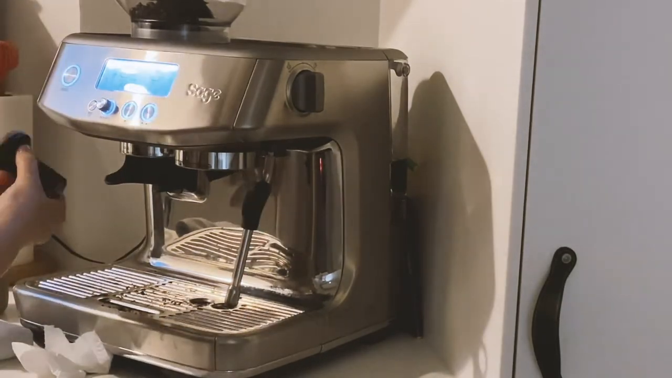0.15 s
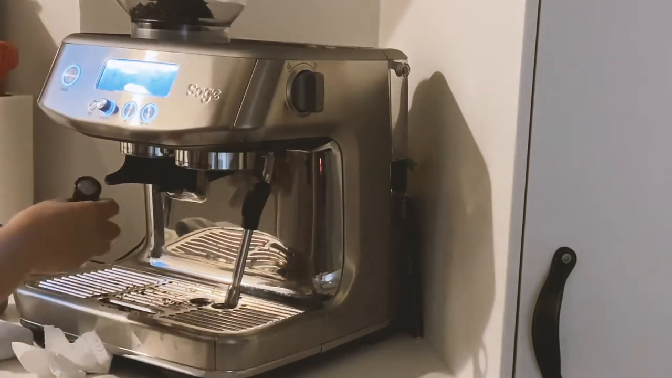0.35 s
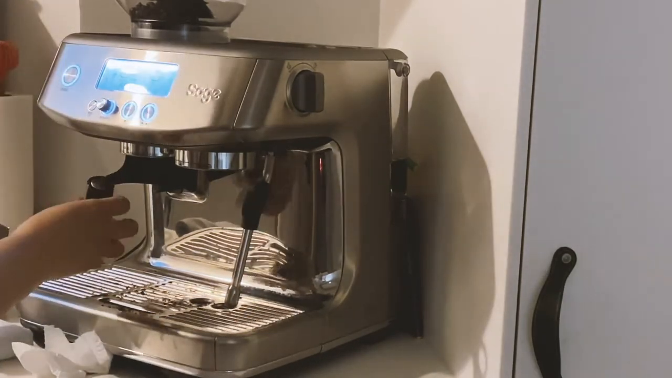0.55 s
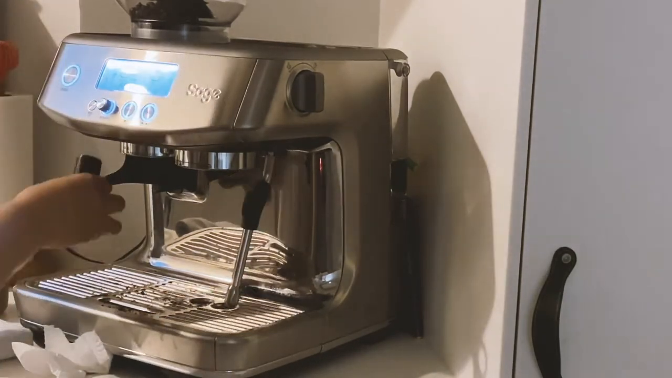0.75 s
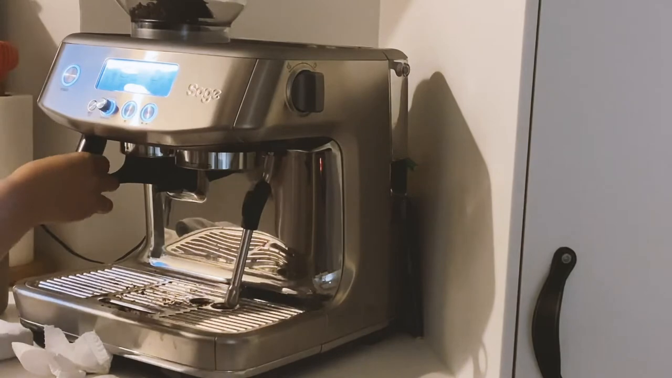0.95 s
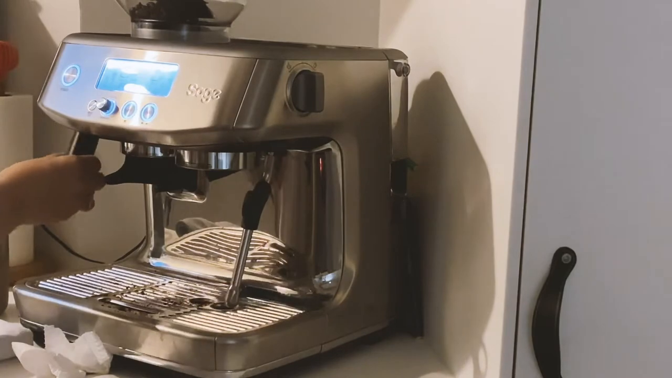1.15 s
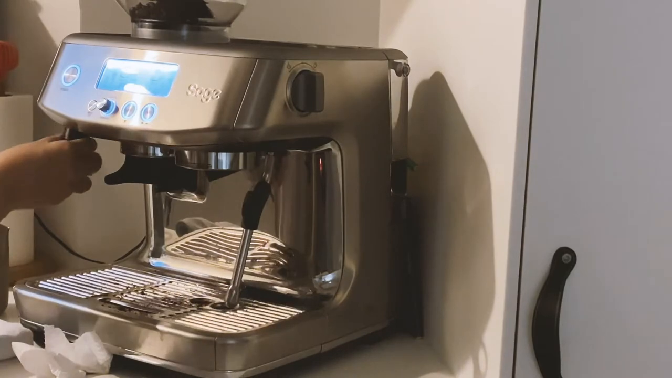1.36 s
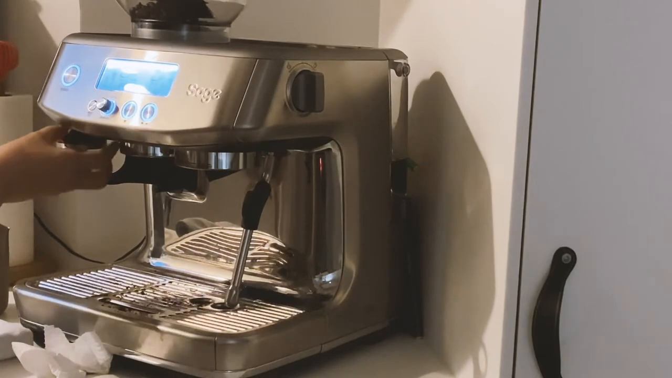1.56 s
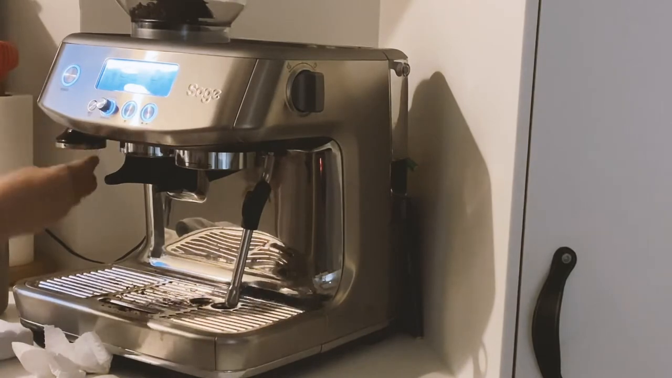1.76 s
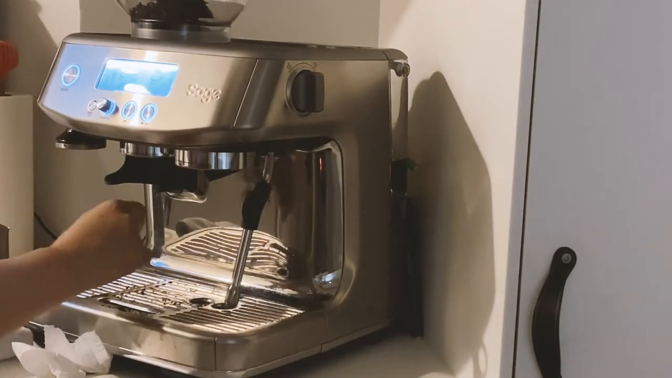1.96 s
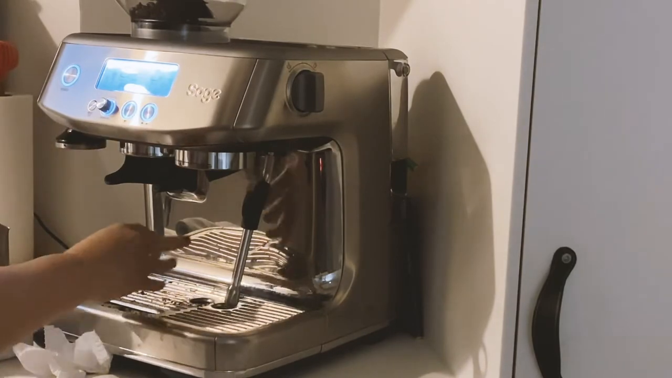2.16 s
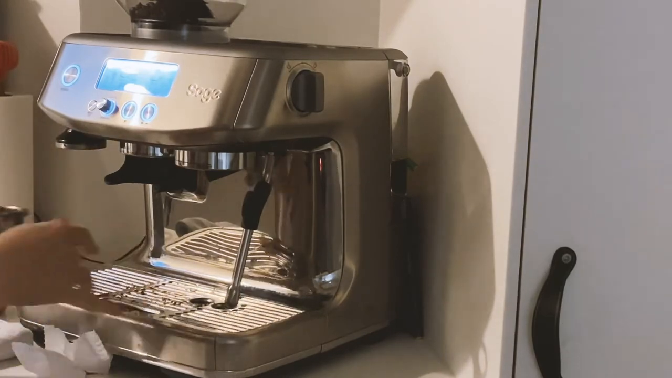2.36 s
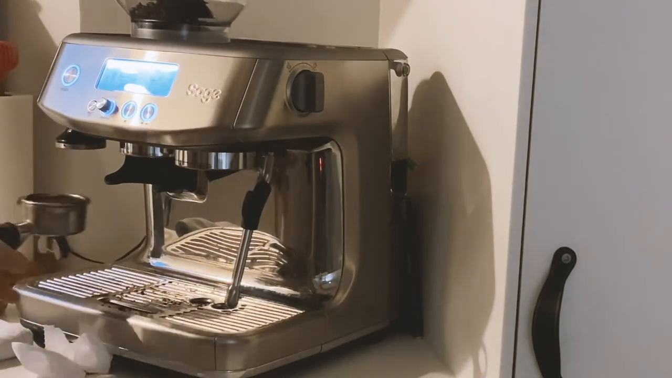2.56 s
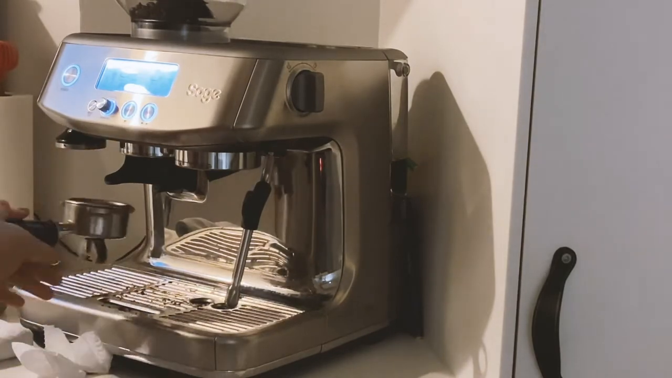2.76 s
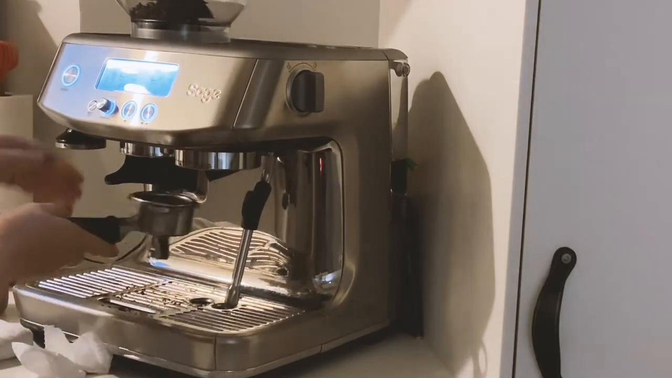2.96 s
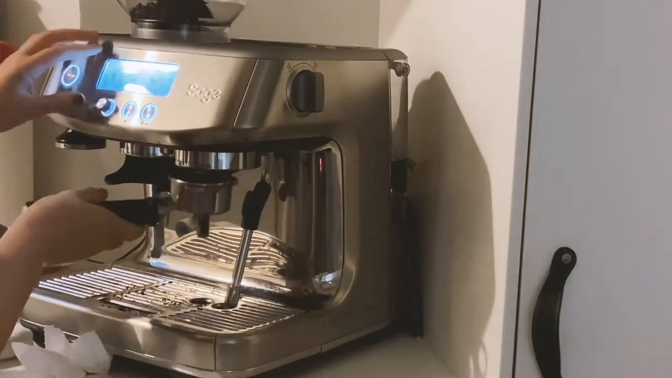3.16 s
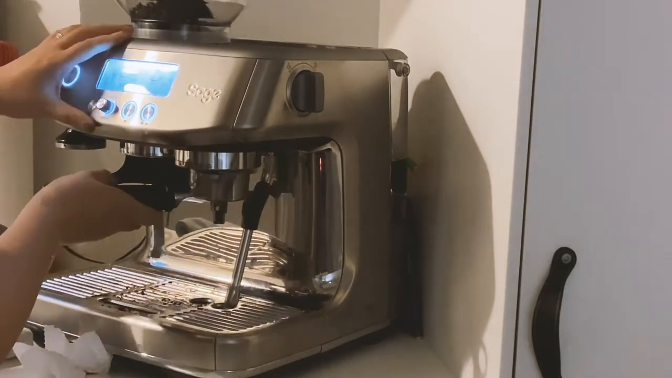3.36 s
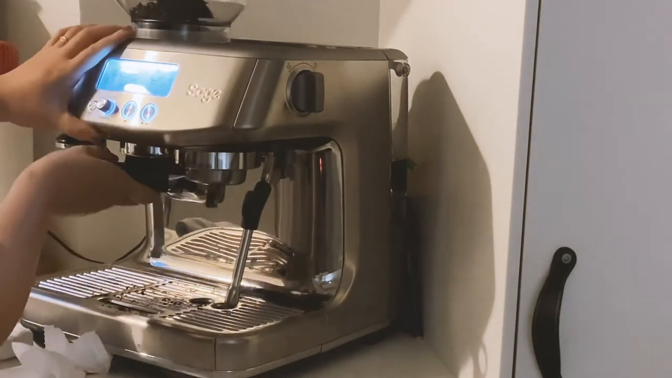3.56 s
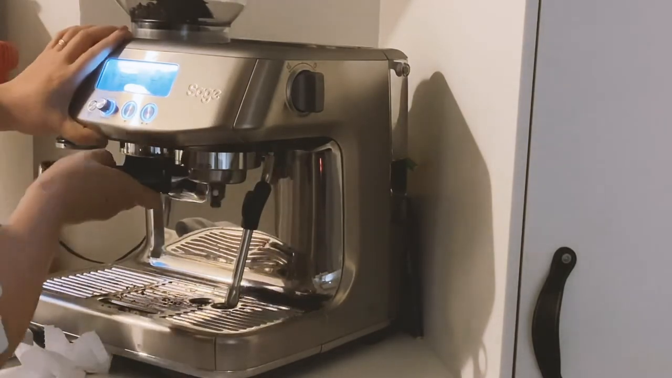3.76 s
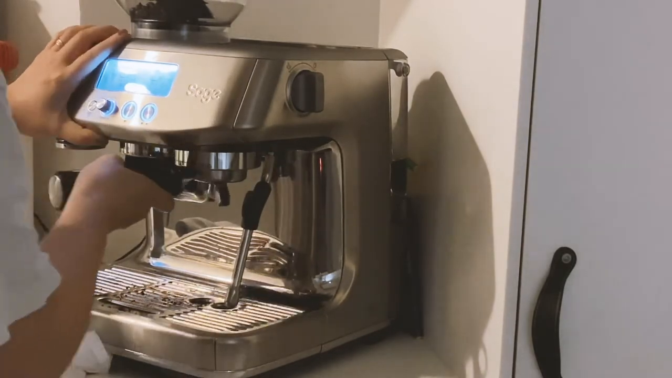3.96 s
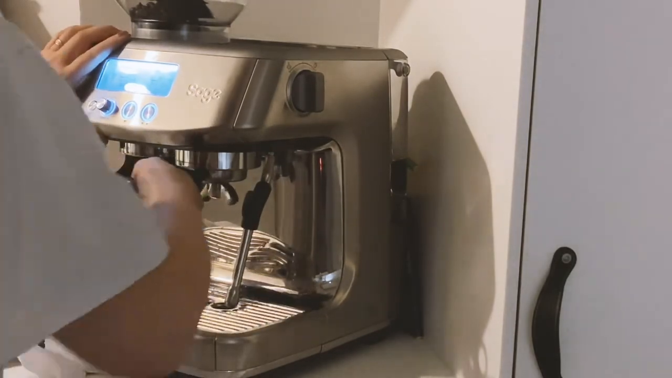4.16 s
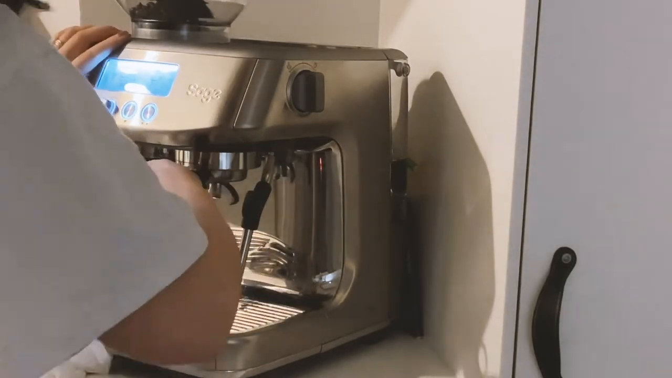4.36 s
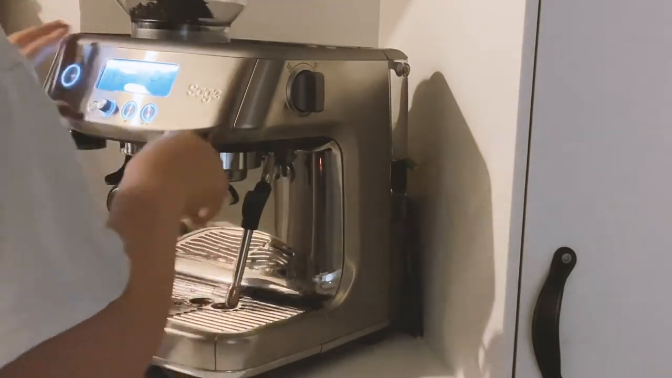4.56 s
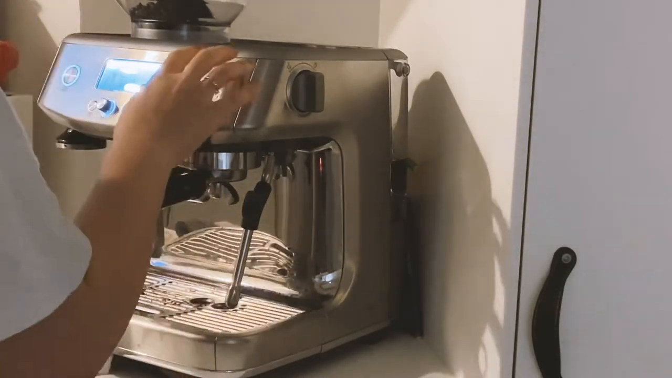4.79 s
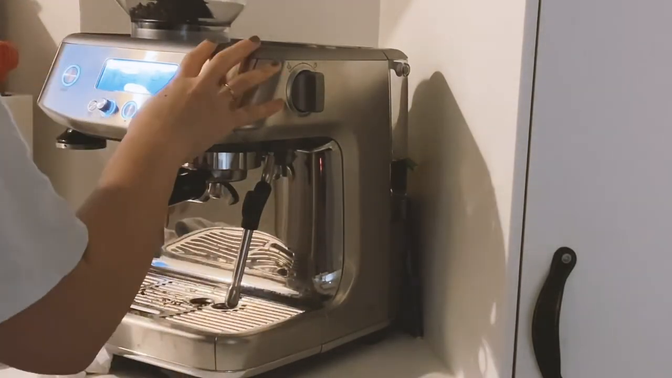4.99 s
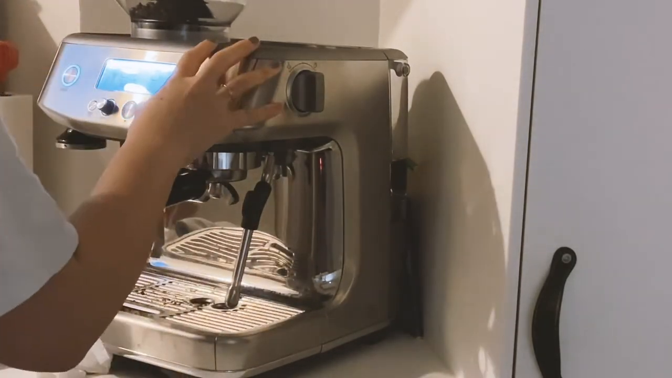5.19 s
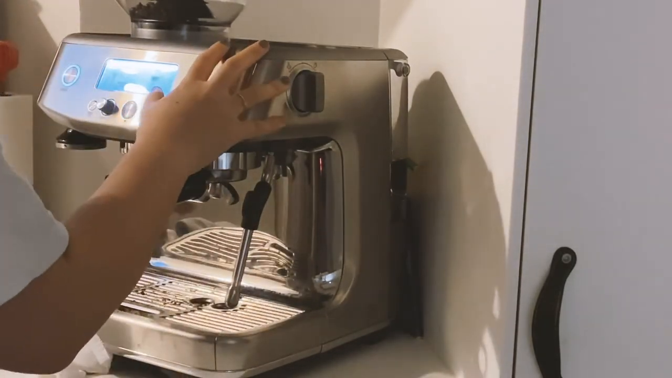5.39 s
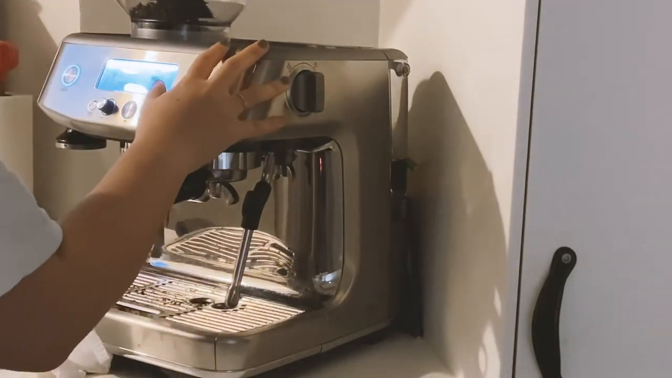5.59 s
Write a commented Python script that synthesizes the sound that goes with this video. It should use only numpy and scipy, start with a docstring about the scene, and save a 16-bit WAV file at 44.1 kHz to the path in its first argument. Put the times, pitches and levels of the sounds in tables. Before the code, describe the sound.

A metal tamper knocks and snaps into its holder, then a portafilter clinks and squeaks into an espresso machine and a button clicks.

```python
"""A small kitchen with an espresso machine. The tamper knocks on its holder, slides up and snaps onto
a magnet; the steel portafilter clinks, bumps into the group head and squeaks on its gasket as it is
twisted tight; a hand brushes past and presses a button. Struck parts ring in their own modes, sliding
parts stick and slip. The room answers, over faint air noise and the low drone of a distant motor."""
import sys
import numpy as np
from scipy import signal
from scipy.fft import rfft, irfft
from scipy.io import wavfile
from scipy.ndimage import uniform_filter1d

SR = 44100
rng = np.random.default_rng(int(sys.argv[2]) if len(sys.argv) > 2 else 0)


def inscribe(sig):
    """Save sig as 16-bit PCM at rate SR to the path in sys.argv[1].

    A 1-D sig is mono; a 2-D sig holds one channel per row.
    Samples are clipped to [-1, 1] before scaling.
    """
    pcm = np.round(np.clip(np.atleast_2d(sig).T, -1, 1) * 32767)
    wavfile.write(sys.argv[1], SR, pcm.astype(np.int16))


N = 248283

WEIGHT_HZ, PIVOT_HZ, SHARP_HZ = 120, 2200, 12400  # corners of the bass and treble tilts


def undb(db):
    """Decibels to gain."""
    return 10 ** (np.asarray(db) / 20)


def unit(x):
    """Scale to unit energy."""
    return x / np.sqrt(np.sum(x ** 2))


def through(x, response):
    """Convolve, keeping the input length."""
    return signal.fftconvolve(x, response)[:len(x)]


def shape(points, size=4096):
    """Minimum-phase impulse response from (f/Hz, level/dB) points."""
    hz, db = np.transpose(points)
    grid_hz = np.maximum(np.arange(size // 2 + 1) * SR / size, 1)
    gain = undb(np.interp(np.log(grid_hz), np.log(hz), db))
    cepstrum = irfft(np.log(gain))
    cepstrum[1:size // 2] *= 2
    cepstrum[size // 2 + 1:] = 0
    return irfft(np.exp(rfft(cepstrum)))


def fade(t, t60_s):
    """Exponential decay, 60 dB down at t60_s."""
    return np.exp(-np.log(1000) * t / t60_s)


def stroke(at_s, length_s, attack_s, release_s):
    """Envelope: builds until at_s, holds, dies away."""
    t = np.arange(N) / SR - at_s
    return np.exp(np.minimum(t, 0) / attack_s - np.maximum(t - length_s, 0) / release_s)


def hiss(colour):
    """Coloured noise, rms 1."""
    return through(rng.standard_normal(N), unit(shape(colour)))


def wobble(samples):
    """Smoothed random wander, standard deviation 1."""
    x = uniform_filter1d(rng.standard_normal(N), samples)
    return x / np.std(x)


def even_noise(count, frame_samples):
    """Noise with a near-flat spectrum in each frame."""
    frames = signal.stft(rng.standard_normal(count), nperseg=frame_samples)[2]
    return signal.istft(np.exp(1j * np.angle(frames)), nperseg=frame_samples)[1][:count]


def knocks(contacts, chatter_t60_s, chatter_db):
    """Contact force: a push plus chatter of the faces. Weight tilts the bass, sharpness the treble."""
    force, t = np.zeros(N + SR), np.arange(SR // 6) / SR
    hz = np.fft.rfftfreq(len(t), 1 / SR)
    lag_s, lag_at_hz = 0.005, 457.7  # bending waves: the bass arrives late
    push = irfft(np.exp(-4j * np.pi * lag_s * np.sqrt(lag_at_hz * hz)), len(t))
    for at_s, db, weight_db, sharp_db in contacts:
        chatter = undb(chatter_db) * unit(even_noise(len(t), 256) * fade(t, chatter_t60_s))
        tilt = shape([(WEIGHT_HZ, weight_db), (PIVOT_HZ, 0), (SHARP_HZ, sharp_db)])
        start = int(at_s * SR)
        force[start:start + len(t)] += undb(db) * through(unit(push + chatter), tilt)
    return force[:N]


def body(force, modes, colour, modes_db, gain_db):
    """Panels answer at once with a mass of short resonances; stiffer parts ring on in clear modes."""
    t = np.arange(SR * 2 // 3) / SR
    ring = sum(undb(db) * np.cos(2 * np.pi * hz * t) * fade(t, t60_s) for hz, db, t60_s in modes)
    panels = through(force, unit(shape(colour)))
    return undb(gain_db) * (panels + undb(modes_db) * through(force, unit(ring)))


def scrape(strokes, colour, attack_s, release_s, slips_per_s=250, spread_db=4):
    """Metal stick-slip: dense uneven jolts, scaled by stroke pressure."""
    pressure = sum(undb(db) * stroke(at_s, length_s, attack_s, release_s)
                   for at_s, length_s, db in strokes)
    slips = rng.random(N) < slips_per_s / SR
    jolts = slips * undb(spread_db * rng.standard_normal(N)) * rng.choice([-1, 1], N)
    return through(jolts / np.std(jolts) * pressure, unit(shape(colour)))


def motor_drone(cruise_hz=21.43, db_per_hz=2):
    """Shaft orders of a distant motor, bass only through the walls; it sags late and gets quieter."""
    # shaft speed: t/s, f/Hz
    speed = [(0, 21.1), (.8, 20.5), (1.8, 21.25), (3.2, 21.2), (4.05, 20.7), (4.45, 20.7), (4.75, 20.4),
             (5.05, 18), (5.6, 16.6)]
    # hum lines: order, level/dB
    orders = [(2, -63.5), (3, -51.5), (4, -60), (5, -76.5), (6, -64), (7, -66.5), (8, -83.5), (9, -72.5),
              (10, -84.5)]
    t = np.arange(N) / SR
    shaft_hz = np.interp(t, *np.transpose(speed))
    turns, hum = np.cumsum(shaft_hz) / SR, 0
    shift_s, shift_width_s, early_odd_db, early_even_db = 1.5, 0.25, -3, 5.5  # the hum changes colour
    early = (1 - np.tanh((t - shift_s) / shift_width_s)) / 2
    for order, db in orders:
        level_db = db + early * (early_odd_db if order % 2 else early_even_db)
        hum += undb(level_db) * np.sin(2 * np.pi * (order * turns + rng.random()))
    return np.sqrt(2) * hum * undb(db_per_hz * (shaft_hz - cruise_hz))


def room_air(rms_db=-57):
    """Steady air noise, mostly bass."""
    # air spectrum: f/Hz, level/dB
    colour = [(20,-26.5),(45,-3),(70,3.5),(110,-9),(170,-18.5),(260,-27),(500,-36),(1400,-42),(1900,-44.5),(2250,-39.5),(3000,-47),(7000,-52.5),(11000,-53.5),(16000,-68.5)]
    return undb(rms_db) * hiss(colour)


def holder_knocks():
    """The tamper bumps the mouth of its holder, which rings."""
    # bumps: t/s, level/dB, weight/dB, sharpness/dB
    contacts = [(0.766, -63, 2, -3.5), (0.798, -22, -3, 2), (1.138, -40.5, 2.5, -17.5),
                (1.229, -29.5, -0.5, -7.5), (1.29, -37.5, 7.5, -3), (1.322, -50, 23, 5)]
    # holder modes: f/Hz, level/dB, t60/s
    modes = [(250.6, -14, 0.45), (434.4, 1, 0.067), (540, -8, 0.43), (687, -5.5, 0.24), (904, -24.5, 0.95),
             (1030, -11, 0.39), (1686, -21, 0.46), (1820, -26, 0.34), (2520, -29, 0.35),
             (2541, -24.5, 0.37), (2840, -23, 0.18), (3122, -46.5, 0.59), (3530, -30, 0.4),
             (6800, -29.5, 0.27)]
    # holder panels: f/Hz, level/dB
    colour = [(50,-20.5),(110,-8.5),(210,-12.5),(400,-2),(640,3),(800,-10),(1100,-10),(1400,-21),(2500,-15),(3100,-33.5),(5000,-40.5),(7000,-39.5),(11000,-42.5),(15500,-46.5)]
    force = knocks(contacts, chatter_t60_s=0.054, chatter_db=-3.5)
    return body(force, modes, colour, modes_db=-12, gain_db=29)


def hand_brushes():
    """Fingers and sleeve rub past; each pass is a soft swell of hiss."""
    # passes: t/s, half-width/s, level/dB, brightness/dB
    passes = [(1.12, 0.074, -75, 2), (1.388, .035, -57, 2), (1.727, 0.013, -63, 15), (1.809, 0.037, -61, 5),
              (1.967, 0.044, -57.5, -3.5), (2.128, .047, -69.5, 5), (2.36, 0.14, -70, -23),
              (2.709, 0.12, -80, 8), (3.627, 0.057, -57, -20.5), (3.79, .03, -54.5, -19),
              (4.358, 0.051, -57.5, -9), (4.814, 0.034, -61.5, -7)]
    # skin and cloth friction: f/Hz, level/dB
    colour = [(500,-27),(2500,-7.5),(4500,-7.5),(7500,-3),(11000,5.5),(15500,4.5)]
    t, friction, out = np.arange(N) / SR, hiss(colour), 0
    for at_s, half_width_s, db, bright_db in passes:
        swell = np.exp(-((t - at_s) / half_width_s) ** 2)
        tilt = shape([(PIVOT_HZ, -bright_db / 2), (SHARP_HZ, bright_db / 2)])
        out += undb(db) * swell * through(friction, tilt)
    return out


def tube_slide():
    """The tamper scrapes and catches on its way up the tube."""
    # catches: t/s, level/dB, weight/dB, sharpness/dB
    contacts = [(1.184, -37.5, -5, -1), (1.229, -27, -3, -6.5), (1.293, -34.5, -3.5, -1)]
    # slides: t/s, length/s, level/dB
    strokes = [(1.148, 0.043, -40), (1.245, .06, -49.5), (1.395, .012, -37)]
    # tube response: f/Hz, level/dB
    colour = [(100,-26.5),(250,-10),(500,-2),(1050,10),(1400,-6),(1700,4.5),(2200,-12.5),(2700,-18),(5000,-29.5),(16000,-48)]
    force = knocks(contacts, chatter_t60_s=0.06, chatter_db=-2.5)
    catches = undb(28.5) * through(force, unit(shape(colour)))
    return catches + scrape(strokes, colour, attack_s=0.022, release_s=0.032)


def magnet_snap():
    """The magnet catches the tamper with a bright ring."""
    # snaps: t/s, level/dB, weight/dB, sharpness/dB
    contacts = [(1.41, -21.5, 0.056, 1), (1.439, -38, 2, -2)]
    # modes at the magnet: f/Hz, level/dB, t60/s
    modes = [(241,-7.5,0.32),(316.3,-4.5,.35),(411,1.5,0.17),(560,3.5,0.35),(646,3.5,0.19),(1024,-0.5,.35),(1220,-3,.25),(1660,-8.5,0.49),(2220,-5,.38),(3980,-5.5,0.27),(3700,-15.5,0.3),(5150,-5.5,0.17),(5539,-8,.31),(5570,-9,.35),(6130,-11,.25),(7830,-6,.22),(8021,0,.29),(10460,1.5,.23),(15300,-5,.19)]
    # short resonances: f/Hz, level/dB
    colour = [(50,-11),(90,1),(140,2.5),(190,-13.5),(250,-0.5),(420,-2),(640,3.5),(800,-13),(1100,-4),(1500,-20),(2200,-9.5),(2900,-21),(4600,-21),(5700,-14.5),(7800,-19),(11300,-14.5),(15500,-17.5)]
    force = knocks(contacts, chatter_t60_s=0.061, chatter_db=-2)
    return body(force, modes, colour, modes_db=-14.5, gain_db=30.5)


def lug_clinks():
    """The portafilter's steel lugs strike and ring."""
    # clinks: t/s, level/dB, weight/dB, sharpness/dB
    contacts = [(2.943, -33.5, -13.5, 11.5), (3.757, -41.5, -32, 1), (3.846, -38, -15.5, -0.5),
                (3.871, -51.5, -28, 21), (3.964, -46.5, -6, 15.5), (4.065, -38.5, -18.5, -3),
                (4.082, -27.5, -50, -4.5)]
    # lug modes: f/Hz, level/dB, t60/s
    modes = [(536,-9,0.49),(880,-11,0.067),(976,0,0.17),(6440,-24,0.15),(11930,-7,.2),(14900,-20,.17)]
    # short resonances: f/Hz, level/dB
    colour = [(80,3),(220,9.5),(520,10),(680,4),(950,3.5),(1400,-5),(2200,-14),(3200,-16),(5000,-20.5),(7200,-19.5),(11000,-19),(15000,-17.5),(16000,-22)]
    force = knocks(contacts, chatter_t60_s=0.043, chatter_db=-5)
    return body(force, modes, colour, modes_db=-16.5, gain_db=28.5)


def group_bumps():
    """The basket bumps into the group head, which rings low."""
    # bumps: t/s, level/dB, weight/dB, sharpness/dB
    contacts = [(3.132, -23.5, -0.5, 2), (3.284, -27, 2.5, -4), (3.374, -32, 6, 5.5),
                (3.409, -28.5, 1.5, -11), (3.692, -40.5, 6, 4)]
    # group head modes: f/Hz, level/dB, t60/s
    modes = [(147, -10.5, 0.14), (418, -23, 0.029), (425, -8.5, 0.12), (635, -25, 1), (1210, -47, 0.2),
             (1650, -36, 0.25), (1596, -23, 0.19)]
    # short resonances: f/Hz, level/dB
    colour = [(40,-12),(85,-3.5),(150,-4.5),(200,-8),(350,3.5),(560,-5),(720,-5.5),(900,-16),(1300,-20.5),(2300,-31.5),(4000,-51.5),(7000,-46),(15500,-41.5)]
    force = knocks(contacts, chatter_t60_s=0.04, chatter_db=0)
    return body(force, modes, colour, modes_db=-10.5, gain_db=28.5)


def lug_grind():
    """The lugs stick and slip along their ramps."""
    # twists: t/s, length/s, level/dB
    strokes = [(3.27, .045, -42.5), (3.412, 0.02, -27.5), (3.47, 0.062, -61), (3.695, 0.04, -44)]
    # grinding spectrum: f/Hz, level/dB
    colour = [(30,-24),(70,20.5),(100,4.5),(145,-9),(200,9.5),(380,-3),(700,-26),(1300,-14.5),(3500,-22.5),(8000,-36.5),(16000,-31)]
    return scrape(strokes, colour, attack_s=0.025, release_s=0.012)


def gasket_squeaks(overtone_db=-15, rasp_db=-9, sag_db=10):
    """Two rubber patches grab and let go over a dry rasp; rougher slip pulls their rates apart."""
    # squeaks: t/s, length/s, f/Hz, level/dB, roughness/0-1
    squeaks = [(3.63, 0.024, 1930, -71, 0.3), (3.654, .04, 3850, -60, 0.4), (3.848, 0.093, 2402, -39, 0.99),
               (3.989, 0.067, 2494, -45, .45), (4.253, 0.44, 2170, -71.5, .35)]
    # rasp spectrum: f/Hz, level/dB
    colour = [(300,-2.5),(1000,-10.5),(2500,8.5),(3600,-5),(5000,-5.5),(16000,-36)]
    rise, spread, jitter = 0.006, 0.06, 0.03  # fractions of the pitch
    rasp, out = undb(rasp_db) * hiss(colour), 0
    patches = [(side, wobble(60) + wobble(900), undb(2.5 * wobble(300) - 6)) for side in (-1, 1)]
    for at_s, length_s, hz, db, rough in squeaks:
        progress = np.clip((np.arange(N) / SR - at_s) / length_s, 0, 1)
        sound = rough * rasp
        for side, wander, grip in patches:
            slip_hz = hz * (1 + rise * progress + rough * (side * spread + jitter * wander))
            phase = 2 * np.pi * np.cumsum(slip_hz) / SR
            sound += grip * sum(undb(overtone_db * k) * np.sin((k + 1) * phase) for k in range(3))
        envelope = stroke(at_s, length_s, attack_s=0.0092, release_s=0.0086)
        out += sound * undb(db - sag_db * progress) * envelope
    return out


def button_press():
    """A finger lands, then the button bottoms out; the casing rings."""
    # landing and end stop: t/s, level/dB, weight/dB, sharpness/dB
    contacts = [(4.95, -54.5, 13, -40), (5.105, -33.5, -1, 0.5)]
    # casing modes: f/Hz, level/dB, t60/s
    modes = [(407,5.5,0.3),(500,-6,0.3),(596,14,0.2),(2330,-0.5,0.24),(3206,-2.5,0.31),(10600,-10,0.33),(10800,-30,.2)]
    # casing panels: f/Hz, level/dB
    colour = [(60,-6.5),(140,-2.5),(210,-12),(400,-2.5),(620,-6.5),(830,-16),(1030,-13.5),(1550,-22),(2400,-19),(3900,-30),(5000,-35),(8000,-33),(10800,-17),(15500,-27)]
    force = knocks(contacts, chatter_t60_s=0.056, chatter_db=-3.5)
    return body(force, modes, colour, modes_db=-16.5, gain_db=34.5)


def switch_tick():
    """The switch ticks partway through the press."""
    # tick: t/s, level/dB, weight/dB, sharpness/dB
    contacts = [(5.044, -39.5, 0, 0)]
    # switch response: f/Hz, level/dB
    colour = [(200, -5), (600, -1), (1200, -4.5), (2200, -7), (2750, 0.5), (3300, -6), (4000, -10),
              (5000, -22), (8000, -27), (15500, -31)]
    force = knocks(contacts, chatter_t60_s=0.15, chatter_db=-1)
    return undb(24.5) * through(force, unit(shape(colour)))


def kitchen(x, direct_db=-9, early_db=-5, late_db=-3):
    """Close corner walls return a dense cluster; the tail dies sooner in the treble."""
    t = np.arange(SR * 3 // 4) / SR
    hz, frame_s, frames = signal.stft(even_noise(len(t), 1024), SR, nperseg=256)
    t60_s = np.interp(hz, [300, 4000, 14000], [0.5, 0.55, 0.3])
    tail = signal.istft(frames * fade(frame_s, t60_s[:, None]))[1][:len(t)]
    late = tail * (1 - fade(t, 0.02))
    early = even_noise(len(t), 512) * fade(t, t60_s=0.16) * (1 - fade(t, 0.0099))
    response = undb(early_db) * unit(early) + undb(late_db) * unit(late)
    response[0] += undb(direct_db)
    return through(x, response)


def scene():
    """Handling sounds through the room, over drone and air; mono."""
    tamper = holder_knocks() + tube_slide() + magnet_snap()
    portafilter = lug_clinks() + group_bumps() + lug_grind() + gasket_squeaks()
    hand = hand_brushes() + button_press() + switch_tick()
    return (kitchen(tamper + portafilter + hand) + motor_drone() + room_air())[None]


def record(dry):
    """Microphone: two narrow treble dips and a steep top edge."""
    notch_passes, top_hz = 4, 15900
    for hz, q in notch_passes * [(9050, 14), (13300, 22)]:
        dry = signal.lfilter(*signal.iirnotch(hz, q, SR), dry)
    return signal.sosfilt(signal.ellip(8, 0.2, 70, top_hz, fs=SR, output="sos"), dry)


dry = scene()
out = record(dry)
inscribe(out)
```